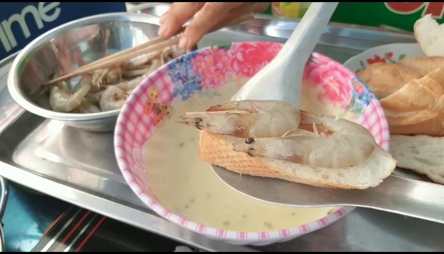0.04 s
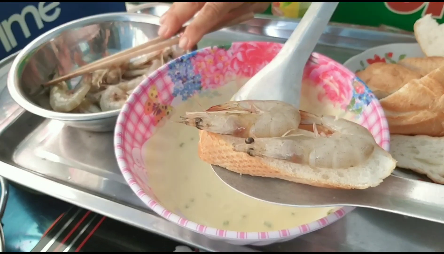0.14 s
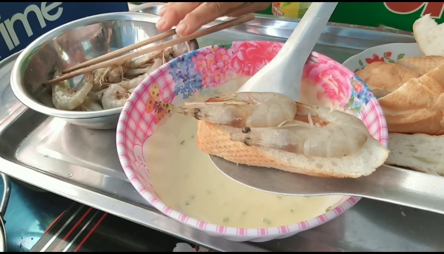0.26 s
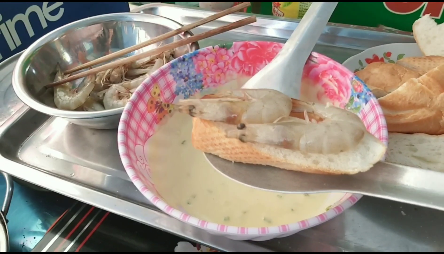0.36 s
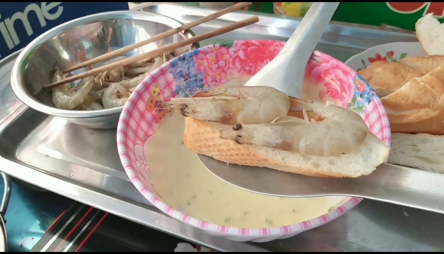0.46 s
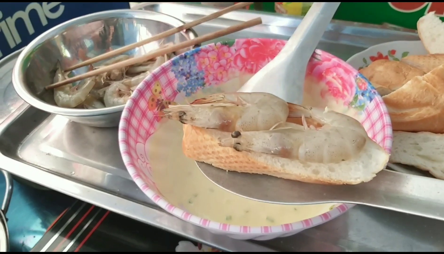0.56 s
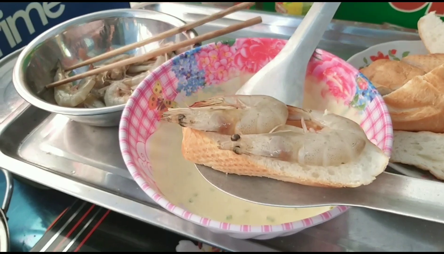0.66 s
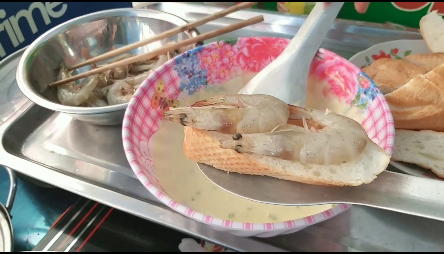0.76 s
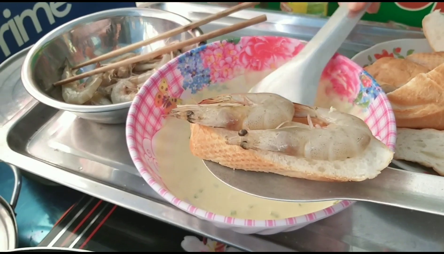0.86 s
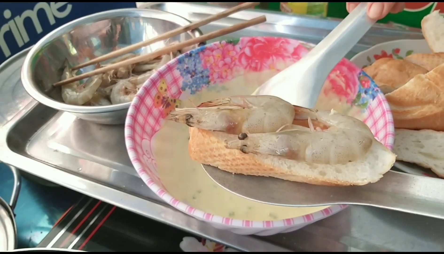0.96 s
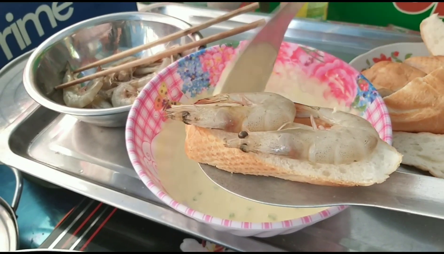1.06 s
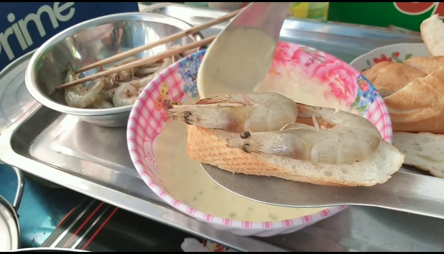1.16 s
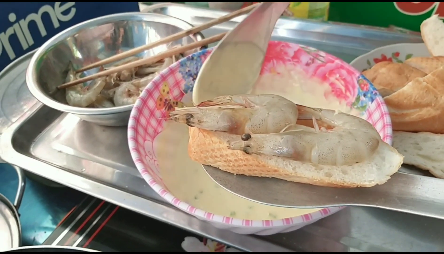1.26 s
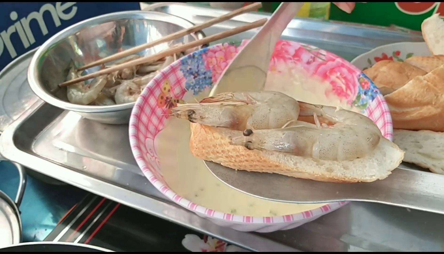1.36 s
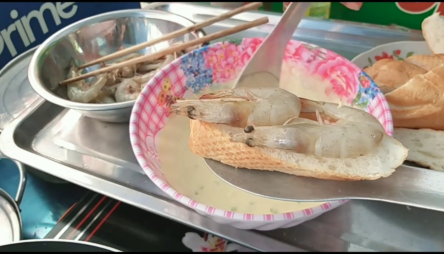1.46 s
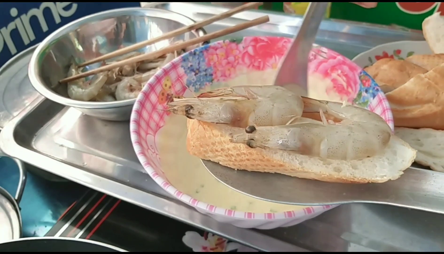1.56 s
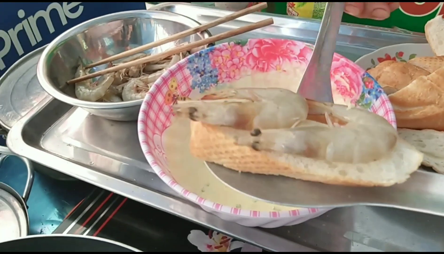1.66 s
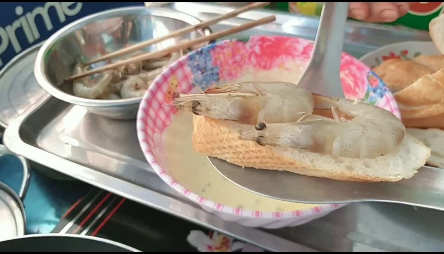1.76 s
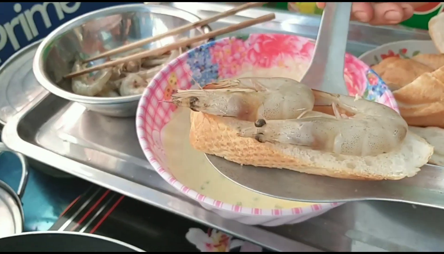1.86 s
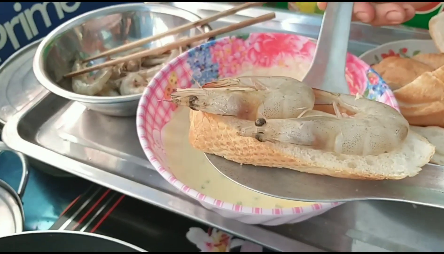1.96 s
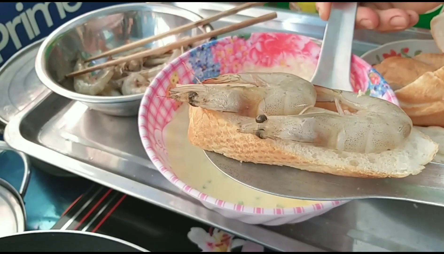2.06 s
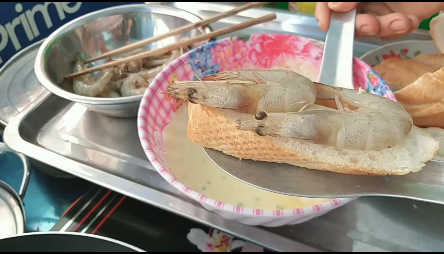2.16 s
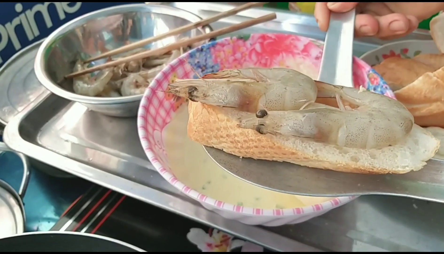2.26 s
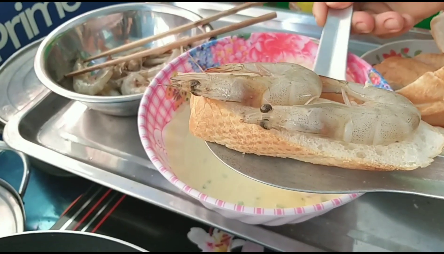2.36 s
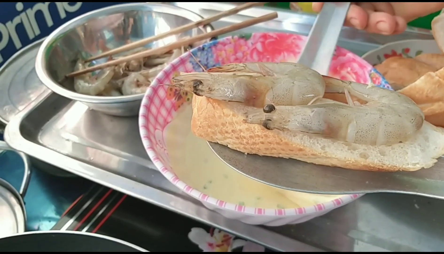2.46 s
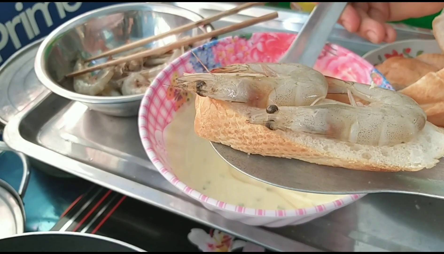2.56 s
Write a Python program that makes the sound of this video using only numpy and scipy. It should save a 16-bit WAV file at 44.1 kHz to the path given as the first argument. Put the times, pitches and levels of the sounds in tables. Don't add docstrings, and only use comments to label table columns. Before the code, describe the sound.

Metal utensils clink: after tiny plastic knocks at the start, a fast steel chatter bursts at 0.2-0.33 s, ringing clear and fading. Faint rubs and ticks come near 0.95 s, a light knock and scrape at 1.5, a loud short plastic knock at 1.75, then scrapes and taps from 2.1 to 2.4. Close phone pickup, short kitchen echo, high insect whine, faint hiss, sleeve rustle, low traffic and engine.

```python
import sys
import numpy as np
from scipy import signal
from scipy.fft import rfft, irfft, next_fast_len
from scipy.io import wavfile
from scipy.ndimage import map_coordinates

SR = 44100
rng = np.random.default_rng(int(sys.argv[2]) if len(sys.argv) > 2 else 0)


def level_to_linear(level):
    exponent = np.asarray(level, float) / 20
    return 10 ** exponent


def to_wav(sig):
    pcm = np.clip(np.atleast_2d(sig), -1, 1) * 32767
    pcm = np.round(pcm).astype(np.int16)
    wavfile.write(sys.argv[1], SR, pcm.T)


N = 114660
T = np.arange(N) / SR


def unit(x):
    return x / np.sqrt(np.mean(x ** 2) + 1e-20)


def along(points, hz):
    point_hz, value = np.transpose(points)
    return np.interp(np.log(hz + 1), np.log(point_hz + 1), value)


def curve(rows):
    return level_to_linear(np.interp(T, *np.transpose(rows)))


def wobble(rate):
    values = rng.standard_normal(int(N * rate / SR) + 4)
    return map_coordinates(values, [T * rate])


def filtered(x, response):
    size = next_fast_len(len(x) + 8192)
    return irfft(rfft(x, size) * response(np.fft.rfftfreq(size, 1 / SR)), size)[:len(x)]


def noise(points, size=N):
    return unit(filtered(rng.standard_normal(size), lambda hz: level_to_linear(along(points, hz))))


def band(hz, centre_hz, wide_hz):
    damping = 1j * hz * wide_hz
    return damping / (centre_hz ** 2 - hz ** 2 + damping + 1e-9)


def ring(modes, t, clock):
    hz, db, t60 = np.transpose(modes)[:, :, None]
    uneven_db = 0.8 * rng.standard_normal(db.shape)
    return (level_to_linear(db + uneven_db - 60 * t / t60) * np.sin(2 * np.pi * hz * clock)).sum(0)


def add(out, s, x):
    part = out[max(round(s * SR), 0):][:len(x)]
    part += x[:len(part)]


def clinks():
    # start_s, spoon_db, spatula_db, bowl_db, crack_db
    contacts = [(0.2204, -8.5, -6, -34, -12.5), (.229, -5, -7.5, -26, -32),
                (0.2367, -10.5, -10.5, -18.5, -39), (0.2464, -6.5, -15, -33, -17.5),
                (.2545, -6.5, -7, -33, -43), (.2625, -6.5, -16.5, -28, -32.5),
                (0.2686, -7.5, -18, -32, -32.5), (0.2787, -12.5, -33, -27.5, -32.5),
                (0.3139, -16, -49, -24, -22.5), (.3205, -50, -14, -24.5, -40.5),
                (0.33, -76, -51, -27, -45.5)]
    # pitch_hz, level_db, fade_s (time to fall 60 dB)
    spoon = [(3794, 0, .45), (3821, -16, .2), (4772, -20, .35), (5895, -31, .9), (6218, -38, .9),
             (8145, -31, .16)]
    spatula = [(1680, -18, .15), (1794, -11, .16), (1864, -11, .15), (1921, -13, .14), (2027, -15, .12),
               (2420, -20, .06), (2686, 0, .1), (3160, -19, .12), (5240, -21, .06), (8600, -20, .08),
               (9710, -22, .11), (10830, -26, .05)]
    bowl = [(1755, -13, .26), (2677, -14, .45), (2690, -9, .45), (3163, -13, .45), (3797, -12, .62),
            (4354, 0, .5), (4799, -13, .6), (5557, -22, .8), (5897, -21, .7), (6219, -23, .6),
            (8021, -34, .9), (8355, -33, .3)]
    # pitch_hz, level_db
    crack_colour = [(150, -46.5), (500, -8.5), (2500, 0.5), (5500, -4.5), (7000, -17), (10000, -6),
                    (15500, -24.5)]
    mute_s = 0.003
    out, t = np.zeros(N), T[:SR]
    ends = [row[0] for row in contacts[1:]] + [np.inf]
    for (s, *ring_db, crack_db), end in zip(contacts, ends):
        alive = np.exp(-np.maximum(t + s - end, 0) / mute_s) * (1 - np.exp(-t / mute_s))
        clock = t + round(s * SR) / SR
        rings = sum(level_to_linear(db) * ring(body, t, clock) for db, body in zip(ring_db, (spoon, spatula, bowl)))
        fade = level_to_linear(-60 * t / 0.03) + level_to_linear(-10 - 60 * t / 0.25)
        onset = 1 - np.exp(-t / 0.00052)
        crack = level_to_linear(crack_db) * fade * onset * noise(crack_colour, size=SR)
        add(out, s, alive * rings + crack)
    return out


def knocks():
    # start_s, level_db, tray_thump_db, struck part
    blows = [(0, -35.5, -39, "edge"), (.025, -24, -72, "edge"), (0.0272, -35.5, -85, "edge"),
             (.034, -30, -51.5, "edge"), (0.038, -28.5, -53, "edge"), (0.0393, -25.5, -36.5, "edge"),
             (0.2221, -22.5, -42, "side"), (0.2223, -39, -62, "pan"), (0.2498, -21.5, -36.5, "side"),
             (.27, -39, -44, "pan"), (0.3156, -44.5, -43, "pan"), (.645, -73, -54, "pan"),
             (.97, -57, -75, "pan"), (1.464, -23.5, -38, "side"), (1.7535, -5, -30, "floor"),
             (1.766, -18.5, -43, "dip"), (1.776, -32, -31.5, "dip"), (2.059, -44, -53, "dip"),
             (2.3114, -22, -47, "rim"), (2.3325, -37, -61, "dip"), (2.42, -25.5, -42.5, "rim")]
    # pitch_hz, level_db, fade_s
    tray = [(120, 0, .2), (205, -6, .12), (310, 0, .12), (400, -4, .09)]
    bowl_edge = [(378, -3.5, 0.054), (1145, -0.5, 0.058), (1378, 1.5, 0.036), (1779, -2.5, 0.061),
                 (2067, -5.5, .04), (2573, -6.5, 0.035), (3800, -20, 0.072), (4450, -21.5, 0.085)]
    bowl_side = [(780, -0.6, 0.016), (1590, 2, 0.014), (2240, -3.2, 0.02), (2950, -13, 0.019),
                 (4500, -17.5, 0.027)]
    bowl_floor = [(887, -3.5, 0.02), (1268, 5, 0.014), (2600, -1.5, 0.011), (3850, -6, 0.0147),
                  (4930, -9, 0.0128), (6150, -18, 0.013), (7460, -20.5, 0.0089)]
    bowl_rim = [(1164, -8, 0.021), (1550, -2.5, 0.011), (2490, -9.5, 0.034), (3300, -13, .01),
                (4460, -7, 0.0046)]
    bowl_dip = [(754, -4.5, .05), (878, -5.2, 0.07), (1000, -3, 0.023), (1386, -10.5, .08)]
    tray_rim = [(239.7, -3.5, 0.18), (274, -0.5, 0.14), (327.4, -2.5, 0.24), (368, 1.5, 0.15),
                (399.6, 1.6, 0.15), (460, -5, .15), (750, -1, 0.18)]
    # pitch_hz, level_db
    puff_colour = [(150, -11.5), (700, 1), (2500, -8.5), (5000, -13), (7000, -31), (15000, -32.5)]
    parts = dict(edge=bowl_edge, side=bowl_side, floor=bowl_floor, rim=bowl_rim, dip=bowl_dip, pan=tray_rim)
    out, t = np.zeros(N), T[:SR // 2]

    def rise(seconds):
        return 1 - np.exp(-(t / seconds) ** 2)

    for s, db, thump_db, part in blows:
        puff = level_to_linear(-18 - 60 * t / 0.17) * rise(0.0018) * noise(puff_colour, size=len(t))
        thump = level_to_linear(thump_db) * ring(tray, t, t) * rise(0.008)
        blow = ring(parts[part], t, t) + puff
        add(out, s, level_to_linear(db) * blow * rise(0.0009) + thump)
    return out


def scrapes():
    # peak_s, rise_s, fall_s, level_db, hiss_db
    strokes = [
        (.004, .004, 0.028, -43, -3.5),
        (.915, 0.014, .008, -49.5, -28.5),
        (0.955, 0.023, 0.02, -34, -21),
        (1.545, 0.012, 0.025, -39, -18),
        (2.09, 0.0025, 0.022, -33.5, -6.5),
        (2.198, 0.0048, 0.016, -43.5, -5.5),
        (2.354, 0.0268, 0.0155, -47, -29),
        (1.968, .03, .03, -58.5, -7),
    ]
    # low_hz, middle_hz, high_hz
    rubbed = [(850, 5300, 8700), (1280, 3200, 4700), (1500, 3350, 4900), (2900, 4400, 5000),
              (2600, 4400, 5600), (2500, 4300, 5500), (1500, 2400, 4300), (1500, 2600, 4000)]
    # low_db, high_db
    rubbed_db = [(11, -5), (-6, -2), (0, -7), (-25, -7.5), (-13, -5.5), (-17, -6), (4.5, 2), (-15, 2)]
    slips_per_s, sharpness = 6000, 6
    out = np.zeros(N)
    for stroke, (low_hz, mid_hz, high_hz), (low_db, high_db) in zip(strokes, rubbed, rubbed_db):
        s, rise, fall, db, hiss_db = stroke
        happens = rng.random(N) < slips_per_s / SR
        size = level_to_linear(1.8 * np.minimum(rng.exponential(size=N), 3.5))
        slips = happens * size * rng.standard_normal(N) + 0.39 * rng.standard_normal(N)
        swell = np.where(T < s, np.exp(-((s - T) / rise) ** 2), np.exp(-np.abs(T - s) / fall))

        def surface(hz):
            low = level_to_linear(low_db) * band(hz, low_hz, 4 * low_hz / sharpness) ** 2
            middle = band(hz, mid_hz, mid_hz / sharpness / 2)
            high = level_to_linear(high_db) * band(hz, high_hz, 2 * high_hz / sharpness) ** 2
            broad = level_to_linear(-20.5) * band(hz, 2000, 5100) ** 2
            hiss = level_to_linear(hiss_db) * band(hz, 12100, 4940) ** 2
            return low - middle + high + broad + hiss

        out += level_to_linear(db + 11.5) * filtered(unit(slips) * swell, surface)
    return out


def ticks():
    # start_s, level_db, pitch_hz, cycles (how long it rings)
    contacts = [(.3155, -21, 2400, 22), (.835, -59, 1800, 90), (.84, -61, 2700, 90), (.912, -50, 1280, 20),
                (.929, -41, 3300, 45), (.9425, -31, 3350, 36), (.966, -36, 1700, 12), (.974, -45, 650, 30),
                (.99, -50, 625, 30), (1.5395, -33, 4400, 16), (1.544, -36, 4450, 12),
                (1.547, -36, 4350, 12), (1.552, -39, 4400, 14), (1.5765, -32, 13000, 6),
                (1.754, -30, 9500, 5), (1.7548, -33, 12500, 6), (2.0853, -19, 13500, 6),
                (2.0893, -19, 10000, 4), (2.1745, -36, 3300, 10), (2.192, -33, 10500, 12),
                (2.1965, -30, 10500, 8), (2.312, -36, 2380, 14), (2.352, -38, 4300, 30),
                (2.4205, -38, 2400, 10)]
    out, t = np.zeros(N), T[:SR // 10]
    for s, db, hz, cycles in contacts:
        speed = hz / cycles
        tone = np.exp(-t * speed * 2) * np.sin(2 * np.pi * hz * t)
        add(out, s, level_to_linear(db) * tone * (1 - np.exp(-t * speed * 20)))
    return out


def insects():
    # pitch_hz, width_hz, level_db
    wings = [
        (5684, 85, -61),
        (5472, 570, -61),
        (10824, 630, -58.5),
        (10280, 250, -69.5),
        (11360, 256, -71.5),
        (9400, 300, -79.5),
    ]
    # time_s, level_db
    chorus = [(0, 6.5), (.45, 1), (.8, -1), (1.2, -2.5), (1.75, 2), (2.6, 1.2)]
    flutter = level_to_linear(1.5 * wobble(90))
    whine = np.zeros(N)
    for hz, wide_hz, db in wings:
        group = filtered(rng.standard_normal(N), lambda f: band(f, hz, wide_hz) ** 2)
        whine += level_to_linear(db) * unit(group)
    return curve(chorus) * flutter * whine


def rustle():
    # time_s, level_db
    movement = [(0, -47.5), (.2, -57.5), (.47, -54.5), (.65, -67.5), (1.4, -81), (1.55, -55.5), (1.7, -64),
                (1.9, -52), (2.03, -56.5), (2.12, -47.5), (2.3, -54.5), (2.6, -55)]
    # pitch_hz, level_db
    cloth = [(250, -21.5), (700, -1.5), (2000, -3), (4300, -0.5), (7000, -10.5), (12000, -8.5), (15500, -9)]
    uneven = level_to_linear(2.2 * wobble(25) + 1.2 * wobble(300))
    return curve(movement) * uneven * noise([(60, -60)] + list(cloth))


def street():
    # pitch_hz, level_db
    rumble = [(25, -8.5), (50, -11.5), (120, 5), (160, 2), (205, 5), (330, -7), (480, -17)]
    level_db = -68.5 + 13.5 * T / T[-1] + 1.5 * wobble(20.74)
    return level_to_linear(level_db) * noise([(13, -22.5)] + list(rumble) + [(900, -66.5)])


def engine():
    # time_s, level_db
    passing = [(0, -62), (.3, -67), (1.6, -76.5), (1.85, -63), (2.2, -58), (2.6, -62)]
    drone = filtered(rng.standard_normal(N), lambda hz: band(hz, 69.6, 8) ** 2)
    return curve(passing) * unit(drone)


def air():
    # pitch_hz, level_db
    hiss = [(400, -8), (1100, -9), (1600, -1.5), (2400, -5), (4600, 3), (6600, -9), (9000, -10),
            (15600, 2.5)]
    return level_to_linear(-57.5 + 0.76 * wobble(12)) * noise([(100, -49.0)] + list(hiss))


def room(x):
    # pitch_hz, fade_s
    fade_times = [(150, 0.81), (1000, 0.33), (4000, 0.31), (12000, 0.055)]
    hz, t, pieces = signal.stft(rng.standard_normal(SR // 2), SR, nperseg=256)
    fade = level_to_linear(-60 * t / along(fade_times, hz)[:, None])
    tail = signal.istft(pieces * fade, SR, nperseg=256)[1]
    late = np.pad(x, (220, 0))
    return signal.fftconvolve(late, tail / np.linalg.norm(tail))[:N]


def scene():
    near = [clinks(), knocks(), scrapes() + ticks()]
    room_db = [-18, -15, -17]
    contacts = sum(x + level_to_linear(db) * room(x) for x, db in zip(near, room_db))
    return (contacts + insects() + air() + street() + engine() + rustle())[None]


def band_limit(x):
    return signal.sosfilt(signal.butter(12, 16680, fs=SR, output="sos"), x)


def record(dry):
    ceiling, knee = 0.92, 5
    low_cut_hz, top_hz = 65, 15650
    limited = dry[0] / (1 + np.abs(dry[0] / ceiling) ** knee) ** (1 / knee)

    def microphone(hz):
        low_cut = (1j * hz / (low_cut_hz + 1j * hz)) ** 2
        return low_cut * level_to_linear(-32 * (hz > top_hz))

    mix = filtered(limited, microphone)[None]
    return band_limit(mix)


dry = scene()
out = record(dry)
to_wav(out)
```